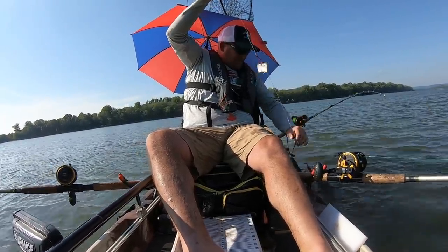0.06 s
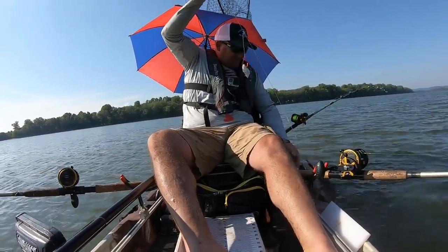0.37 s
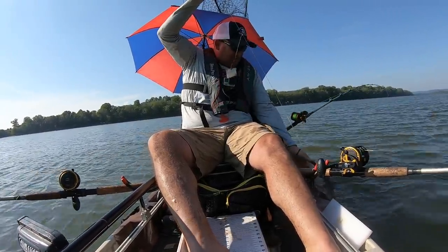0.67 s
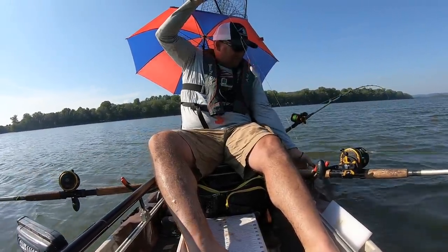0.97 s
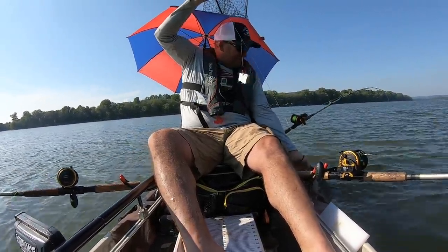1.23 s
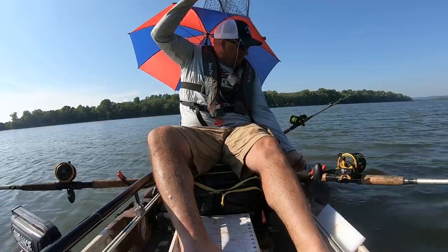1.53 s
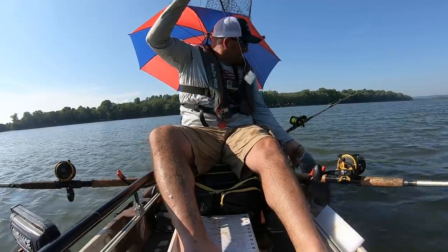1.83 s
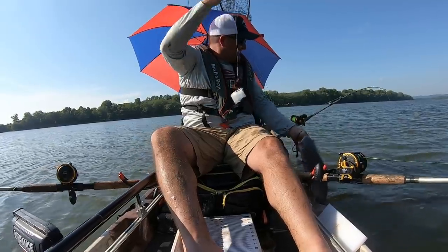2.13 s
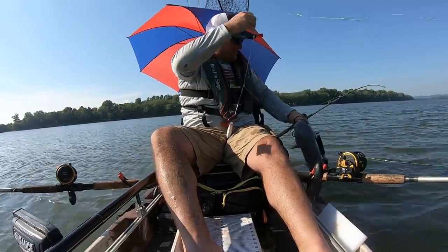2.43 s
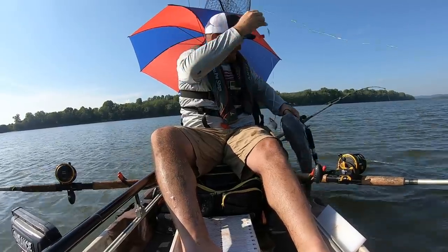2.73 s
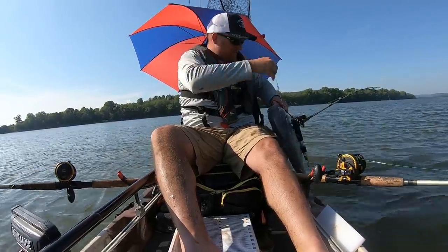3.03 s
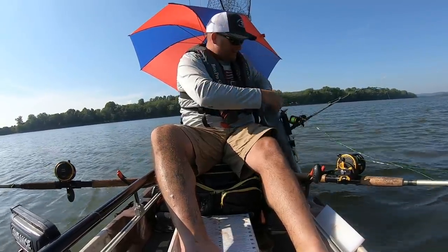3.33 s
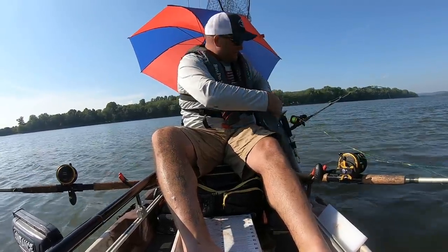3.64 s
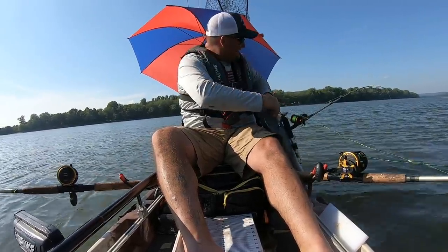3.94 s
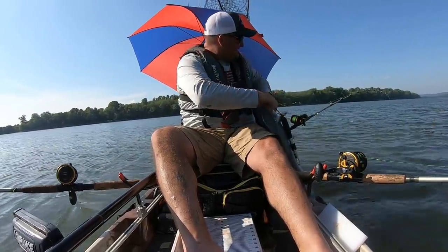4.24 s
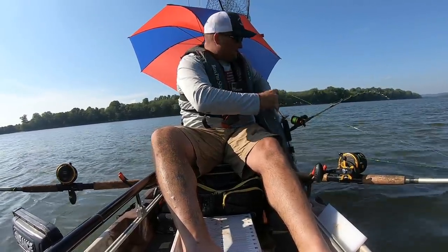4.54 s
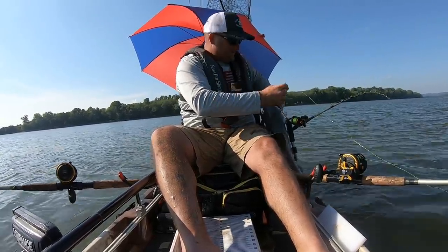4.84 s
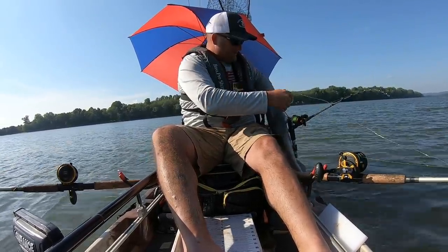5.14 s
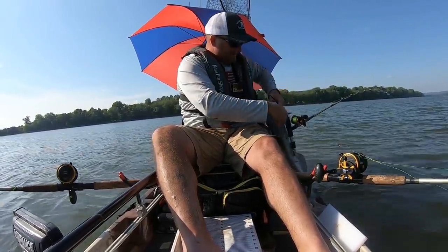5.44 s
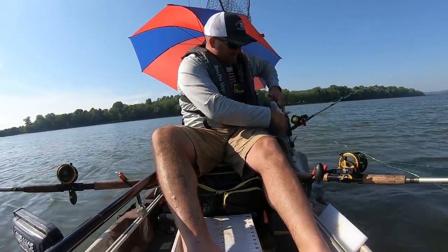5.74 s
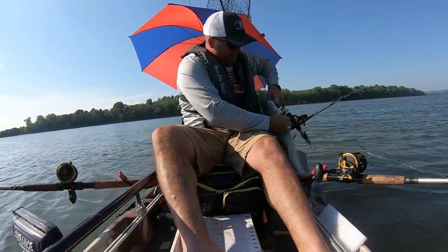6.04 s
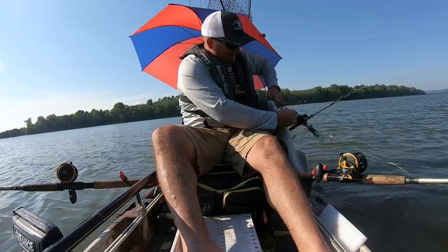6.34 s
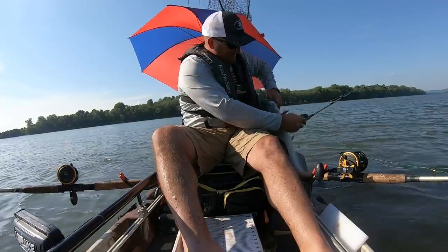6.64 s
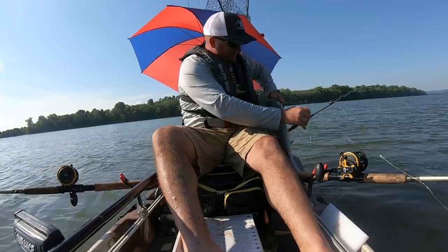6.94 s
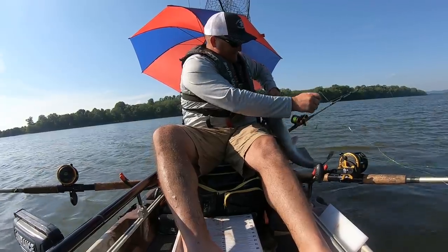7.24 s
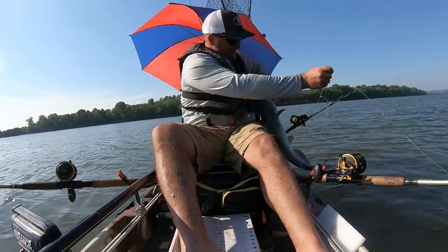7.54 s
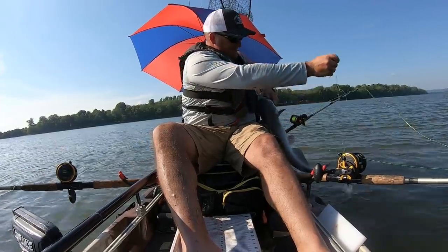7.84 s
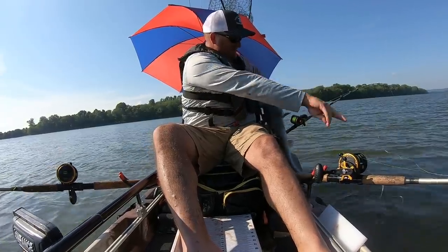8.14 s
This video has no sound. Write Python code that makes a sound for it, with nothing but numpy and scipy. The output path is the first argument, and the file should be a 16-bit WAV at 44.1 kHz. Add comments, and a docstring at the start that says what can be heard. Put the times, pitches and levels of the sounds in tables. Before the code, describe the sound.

A large fish and gear knock against a hollow plastic kayak, making the whole boat boom. Small waves then slap and lap at the side while fishing tackle clicks and a sleeve swishes softly. A cluster of heavy knocks follows, then a short scrape and another burst of knocks. Wind rumbles on the close microphone throughout, out on open water.

```python
"""A large fish is hauled up the side of a plastic kayak on open water.
First the fish and gear knock on the hollow hull, and the whole boat booms.
Then small waves slap the side while fishing tackle clicks and a wet sleeve swishes.
Heavy knocks come at about 5 s; near 7 s a short scrape leads into another burst of them.
All along, wind and the rocking boat rumble under a thin hiss, with faint chirps in the first half."""
import sys
import numpy as np
from scipy import signal
from scipy.fft import rfft, irfft, next_fast_len
from scipy.io import wavfile
from scipy.ndimage import uniform_filter1d

SR = 44100
rng = np.random.default_rng(int(sys.argv[2]) if len(sys.argv) > 2 else 0)


def dump(signal):
    """Clip the signal to [-1, 1] and save it as 16-bit WAV at the path in sys.argv[1]."""
    limited = np.clip(np.atleast_2d(signal).T, -1, 1)
    pcm = np.round(limited * 32767).astype(np.int16)
    wavfile.write(sys.argv[1], SR, pcm)


N = 361368
TIME = np.arange(N) / SR
RING = 16384  # samples given to one hit to ring out
RING_HZ, RING_S = np.fft.rfftfreq(RING, 1 / SR), np.arange(RING) / SR


def hull_hits(direct_db=-2, plate_db=0.5, cavity_db=-2, cavity_fade_s=.34, lag_s=.0014,
              note_db=2, note_sharpness=4, return_db=-4, return_s=0.023, return_hz=380):
    """Each hit sends bending waves through the plastic shell, which echo round it and stir the air inside."""
    # the fish and gear knock; harder contact has a higher corner, the pitch above which the treble falls:
    # (time [s], strength [dB], corner [Hz], fall [dB per octave], bass [dB], note of the spot [Hz])
    knocks = [(0.1172, 22, 880, 9.5, 8, 2290), (0.1796, 6.5, 1960, 13.5, -5, 590),
              (0.1864, 28, 286, 10, -7, 2280), (0.3952, -1, 460, 8, 7, 616),
              (0.4614, 11.5, 306, 10.5, -11, 657), (1.1567, 8, 355, 10.4, -2, 517),
              (1.253, -9, 1780, 13, 4, 525), (2.7526, -14.5, 1140, 12, 5, 294),
              (2.982, -13, 3140, 27, 15, 1194), (3.2637, 22, 630, 18, -9.5, 282),
              (4.2413, 2.5, 492, 7.3, -16.5, 326), (4.854, 9.5, 450, 9, -4, 684),
              (4.91, 11.5, 366, 9, -8, 1680), (5.0369, 30, 844, 11, -4, 313),
              (5.2543, 36.5, 597, 14, -9.5, 1660), (5.291, 23.5, 386, 12.5, -13, 900),
              (5.3425, 37.5, 584, 16.5, -14.5, 1100), (5.398, 14.5, 2170, 19.5, 7, 780),
              (6.0536, 12, 1230, 17, -10.5, 1220), (6.558, -10.5, 1220, 15.5, 8, 1195),
              (7.0413, 21, 967, 16.5, -9, 870), (7.1533, 28.5, 332, 17.5, -23, 854),
              (7.168, 6.5, 1340, 20, 8, 295), (7.1979, 10.5, 1330, 18.5, 0, 2320),
              (7.2073, 6.5, 1660, 28, 4, 375), (7.2341, 24.5, 1120, 16, -8.5, 350),
              (7.4328, -16, 2490, 14, -2, 1490), (7.7568, -13, 600, 16, 8.5, 286)]
    # the notes the hull rings with: (pitch [Hz], width [Hz], level [dB])
    hull_notes = [(174.5, 20, -4.5), (220.3, 6.5, -0.5), (325.8, 20, -1), (352, 34, -6.5), (455, 14, -6.5),
                  (531, 65, -10), (638, 30, -9), (742, 35, -5.5), (948, 12, -6.5), (1170, 40, -8.5),
                  (1620, 15, 3), (1945, 32, -2), (2193, 81, 0.5), (2600, 50, -2), (2965, 50, -6.5),
                  (3380, 90, -6), (5105, 206, 11.5), (5776, 180, -1)]
    # how long waves last in the shell: (frequency [Hz], time to fade by 60 dB [s])
    plate_fades = [(110, 0.43), (220, 0.21), (440, 0.13), (880, 0.086), (1760, 0.03), (3500, 0.05),
                   (7000, 0.031), (14000, 0.029)]
    # the air inside the hull rings on softly: (frequency [Hz], level [dB])
    cavity_colour = [(110, -20.5), (220, -16.5), (440, -28.5), (880, -8), (1760, -13), (3500, -15),
                     (7000, -37), (14000, -45.5)]
    # the tone of the hull as a whole: (frequency [Hz], level [dB])
    hull_colour = [(40, -18.5), (100, -7.5), (170, -1.5), (280, -3), (400, -5.5), (560, -3), (900, -5),
                   (1150, -2), (1450, -6), (2100, -4.5), (2550, -3.5), (2830, -6), (3450, -4.5),
                   (4200, -10), (8500, -4.5), (15000, -6)]
    out = np.zeros(N)
    centres, fades_s = np.transpose(plate_fades)
    bands = octave_bands(centres)
    cavity = hit_spectrum(cavity_db + colour_at(cavity_colour, RING_HZ))
    colour_db = colour_at(hull_colour, RING_HZ)
    for s, db, corner_hz, fall_db, bass_db, note_hz in knocks + wave_slaps() + scrape():
        # a soft contact lasts longer and cannot stir up the treble
        treble_loss_db = fall_db / 4 * np.log2(1 + (RING_HZ / corner_hz) ** 4)
        contact_db = bass_db / (1 + (RING_HZ / 300) ** 4) - treble_loss_db
        # the struck panel, or the air trapped against it, gives each hit its own hollow note
        detune = (RING_HZ + 1) / note_hz
        note = 1 + amp(note_db) / (1 + 1j * note_sharpness * (detune - 1 / detune))
        shell = note * (amp(direct_db) + amp(plate_db) * echoes(bands, fades_s, rise_s=0.0007))
        # only the low waves return from the far end of the boat, as a sinking plop
        low_waves = amp(return_db) / (1 + (RING_HZ / return_hz) ** 4)
        far_end = low_waves * bending(return_s * rng.uniform(.8, 1.2))
        inside = cavity * echoes(bands, cavity_fade_s, rise_s=0.01)
        push = hit_spectrum(contact_db + colour_db) * bending(lag_s)
        hit = push * (shell + far_end + inside) * ringing(hull_notes, spread_db=2.0)
        add(out, s - lag_s / 2, amp(db) * irfft(hit))
    return out


def wave_slaps(fall_db=17.5, bass_db=-7, pocket_hz=477, spread=0.084):
    """Lists hits of water on the hull: each is soft and traps a pocket of air of about the same note."""
    # a flatter, sharper slap has a higher corner: (time [s], strength [dB], corner [Hz])
    slaps = [(0.3051, 7, 500), (0.732, 6, 700), (1.0388, 12, 296), (1.146, 2, 755), (1.4397, -4.5, 610),
             (1.7978, 18, 420), (1.916, 18, 436), (2.0279, 11, 380), (2.0985, 3.5, 400), (2.4844, 24, 472),
             (3.272, 12.5, 864), (3.3355, 13.5, 420), (3.3914, 9, 433), (3.602, 18, 497), (3.836, 1.5, 536),
             (3.8642, 6, 388), (3.9185, 4, 470), (3.9547, 12, 583), (4.0383, 15.5, 553), (4.3379, 5.5, 396),
             (4.6613, 0, 870), (4.6882, 6, 440), (4.7202, 12.5, 962), (4.7788, 15.5, 768),
             (4.811, 12.5, 458), (5.3131, 16.5, 836), (5.5053, 11.5, 350), (5.53, 1.5, 1050),
             (5.613, 29, 464), (5.631, 7, 495), (5.7422, 2, 750), (5.8363, 17.5, 382)]
    return [(s, db, corner_hz, fall_db, bass_db, pocket_hz * np.exp(spread * rng.standard_normal()))
            for s, db, corner_hz in slaps]


def scrape(start_s=6.951, gap_s=.0255, first_db=-15.5, growth_db=4.5, count=4):
    """Lists the hits of a short scrape on the hull: evenly spaced slips, each harder than the last."""
    # how one slip meets the hull: (corner [Hz], fall [dB per octave], bass [dB], note [Hz])
    contact = (1890, 28, -23, 1284)
    return [(start_s + k * gap_s, first_db + k * growth_db, *contact) for k in range(count)]


def boat_booms():
    """The whole boat swings with a low note when weight shifts."""
    # the booms: (time [s], pitch [Hz], level [dB], time to fade by 60 dB [s])
    booms = [(0.127, 169, -17, 0.21), (0.166, 67.6, -11.5, 0.23), (0.199, 139.4, -15, 0.163),
             (0.385, 142.4, -29.5, 0.36), (0.469, 77.7, -26, 0.39), (3.016, 138, -25, 0.23),
             (5.062, 214.3, -14, 0.17), (5.39, 64, -25, 0.21)]
    out = np.zeros(N)
    for s, hz, db, fade_s in booms:
        add(out, s, fading_note(hz, db, fade_s, rise_s=0.0087))
    return out


def tackle_clicks(click_db=-1, rattle_db=-1, rattle_fade_s=.032, pivot_hz=4500, top_hz=11500, low_hz=1300):
    """Small hard parts, each of a slightly different size, snap together and rattle for a moment."""
    # the clicks: (time [s], strength [dB], relative brightness [dB per octave])
    clicks = [(0.1152, -10, 5), (0.18, -18, -2), (0.186, -19.5, 8.5), (0.46, -23, -2.5), (0.979, -29, 0),
              (1.04, -32.5, -2), (1.833, -25, -7), (3.0187, -30, 5), (3.477, -27, -5),
              (3.5565, -18.5, -2.5), (3.6253, -13.5, -0.5), (3.8237, -32, -4), (4.2389, -20.5, 1),
              (4.3007, -32.5, -3), (4.464, -17, 2), (4.906, -15.5, 3), (6.214, -28.5, 1.5),
              (6.383, -21.5, -3.5), (6.602, -15.5, -1), (7.0227, -33, -1), (7.0859, -32, -10),
              (7.8586, -35, -2)]
    # the notes the tackle rings with: (pitch [Hz], width [Hz], level [dB])
    tackle_notes = [(2250, 250, -1.5), (3180, 260, 5), (5130, 240, 4.5), (6880, 194, -11.5),
                    (8850, 470, 5.5)]
    out, bands = np.zeros(N), octave_bands([1000, 4000, 12000])
    body_db = -10 * np.log10((1 + (RING_HZ / top_hz) ** 6) * (1 + (low_hz / (RING_HZ + 1)) ** 2))
    for s, db, bright_db in clicks:
        tilt_db = (bright_db - 4.0) * np.log2(np.maximum(RING_HZ, 2500) / pivot_hz)
        snap = 0.13 + amp(rattle_db) * echoes(bands, rattle_fade_s, rise_s=0.00028)
        part_notes = np.array(tackle_notes) * [rng.uniform(.93, 1.07), 1, 1]
        click = hit_spectrum(tilt_db + body_db) * snap * ringing(part_notes, spread_db=0)
        add(out, s, amp(db + click_db) * irfft(click))
    return out


def drip_plinks():
    """Drips and small bits of gear ring with a note that dies almost at once."""
    # the plinks: (time [s], pitch [Hz], level [dB])
    plinks = [(.1172, 2210, -12), (0.1192, 1100, -17), (0.1187, 3630, -29), (1.069, 1090, -48),
              (2.224, 1640, -48.5), (2.605, 1500, -47), (2.981, 3220, -46), (2.986, 1240, -42.5),
              (6.055, 1290, -22), (6.558, 1284, -45), (6.603, 3220, -47), (6.601, 4940, -41),
              (7.13, 1220, -34)]
    out = np.zeros(N)
    for s, hz, db in plinks:
        add(out, s, fading_note(hz, db, fade_s=.032, rise_s=.0005))
    return out


def lapping(lap_db=-2, pops_per_s=520, size_db=2.5, wash=0.7, calm_db=-68, pitches=24):
    """Small pockets of air pop dully along the waterline, over a soft wash; both swell with each slosh."""
    # water sloshes along the side: (peak time [s], length [s], level [dB])
    sloshes = [(0.0, 0.19, -51), (0.39, 0.39, -48.5), (1.03, 0.29, -51), (1.75, 0.44, -47.5),
               (3.31, 0.37, -50), (3.65, 0.29, -50.5), (4.33, 0.61, -49), (4.86, .3, -50),
               (5.56, 0.33, -51.5), (7.0, 0.23, -55.5)]
    # the dull tone of the water: (frequency [Hz], level [dB])
    water_colour = [(100, -10), (250, 1), (480, -2), (800, -5.5), (1300, -12.5), (2500, -14.5), (5000, -24),
                    (12000, -48)]
    pops, t = np.zeros(N), RING_S[:4096]
    for hz in np.geomspace(240, 1800, pitches):
        age = t * hz / 2.5  # higher bubbles die sooner
        bubble = np.exp(-age) * (1 - np.exp(-6 * age)) * np.sin(2 * np.pi * hz * t)
        sizes = amp(size_db * np.minimum(rng.exponential(1, N), 4))
        starts = rng.random(N) < pops_per_s / pitches / SR
        pops += signal.oaconvolve(sizes * starts, evened(bubble))[:N]
    stir = np.hypot(amp(calm_db), swells(sloshes, rise=.35, shape=2.0))
    water = evened(pops) + wash * rng.standard_normal(N)
    return amp(lap_db) * stir * coloured(water, water_colour)


def sleeve_swishes(rub_db=-1, grain_db=1.5, rest_db=-81, fizz_db=-3, fizz_growth=.6):
    """Cloth slides over the life vest in small uneven slips; a faster stroke is brighter."""
    # strokes of the sleeve: (peak time [s], length [s], level [dB])
    strokes = [(1.25, .5, -69), (1.73, .55, -64.5), (2.36, 0.4, -56.5), (3.83, 0.28, -59),
               (4.68, 0.15, -58.5), (6.2, 0.82, -69.5), (7.57, 1.18, -63), (8.1, .5, -67)]
    # the tone of rubbing cloth: (frequency [Hz], level [dB])
    rub_colour = [(300, -6), (1150, 13), (1600, 6), (3200, 1), (5500, -0.5), (8000, -1.5), (11000, -4.5),
                  (14000, -5.5), (16000, -10.5)]
    # the extra treble of a fast stroke: (frequency [Hz], level [dB])
    fizz_colour = [(3000, -22), (7000, -6), (11000, -1.5), (14000, -5), (16000, -13)]
    slips = evened(uniform_filter1d(rng.standard_normal(N), 200))
    speed = np.hypot(amp(rest_db), swells(strokes, rise=0.5, shape=1.13))
    rub = amp(rub_db) * noise(rub_colour)
    fizz = amp(fizz_db) * (speed / speed.max()) ** fizz_growth * noise(fizz_colour)
    return speed * (rub + fizz) * evened(amp(grain_db * slips))


def rumble(wind_db=3, rock_db=-1.0):
    """Wind buffets the microphone, and the hull rocks under it, harder at each lurch."""
    # the slow rise and fall of the rumble: (time [s], wind level [dB], rocking level [dB])
    drift = [(0, -28, -45.5), (.45, -26, -44), (.85, -32, -49.5), (1.2, -40, -40.5), (1.52, -24, -55),
             (1.8, -39.5, -45), (2.1, -30, -46.5), (3.25, -25, -42.5), (3.7, -23.5, -36.5),
             (4.25, -29, -46.5), (4.7, -29, -41), (5.15, -24, -39.5), (6.1, -35.5, -53), (6.8, -31, -48.5),
             (7.55, -27.5, -51.5), (8.19, -31, -49)]
    # the boat lurches: (peak time [s], length [s], level [dB])
    lurches = [(0.15, 0.27, -23.5), (0.53, 0.39, -37.5), (2.53, 0.15, -33.5), (4.08, 0.089, -38),
               (5.07, 0.21, -27.5)]
    # the very deep tone of the wind: (frequency [Hz], level [dB])
    wind_colour = [(4, -1.5), (10, 5.5), (16, 6.5), (25, 6), (40, -10.5), (60, -16.5), (100, -31.5),
                   (200, -76)]
    # the low tone of the rocking hull: (frequency [Hz], level [dB])
    rock_colour = [(30, -26.5), (55, -4.5), (72, 0), (100, -6.5), (150, -16.5), (250, -20.5), (500, -42),
                   (1000, -69)]
    times, gusts_db, sway_db = np.transpose(drift)
    gusts = amp(np.interp(TIME, times, gusts_db))
    sway = amp(np.interp(TIME, times, sway_db))
    rocking = np.hypot(sway, swells(lurches, rise=0.23, shape=1.3))
    return amp(wind_db) * gusts * noise(wind_colour) + amp(rock_db) * rocking * noise(rock_colour)


def faint_chirps():
    """Thin, slightly raspy whistles rise and fall in pitch."""
    # the chirps: (middle time [s], length [s], top pitch [Hz], level [dB])
    chirps = [(0.973, 0.092, 3020, -62), (1.647, 0.024, 3180, -60), (2.082, 0.0094, 2560, -48),
              (2.461, 0.025, 2340, -55.5), (2.949, 0.033, 2400, -57.5), (3.113, 0.015, 2850, -59.5)]
    out = np.zeros(N)
    for s, length, hz, db in chirps:
        position = np.linspace(-1, 1, round(length * SR))
        rasp = .04 * evened(uniform_filter1d(rng.standard_normal(RING), 50))[:len(position)]
        cycles = np.cumsum(hz * (1 - 0.095 * position ** 2 + rasp)) / SR
        add(out, s - length / 2, amp(db) * np.cos(np.pi * position / 2) * np.sin(2 * np.pi * cycles))
    return out


def air_hiss(level_db=-60.5):
    """Quiet, steady air with a thin hiss near 8 kHz."""
    # the tone of the air: (frequency [Hz], relative level [dB])
    air_colour = [(100, 14), (300, 4), (800, 3.5), (1500, -5), (2400, -8), (3100, -6), (4000, -12.5),
                  (5100, -10), (6600, -16), (7900, -1), (9200, -16), (12000, -17), (16000, -24)]
    return amp(level_db) * noise(air_colour)


def amp(db):
    """Turns decibels into a number to multiply a sound by."""
    return 10 ** (np.asarray(db) / 20)


def evened(x):
    """Scales a sound to an average power of 1."""
    return x / np.sqrt(np.mean(x ** 2) + 1e-20)


def add(mix, s, sound):
    """Mixes a sound in at s seconds."""
    part = mix[max(round(s * SR), 0):][:len(sound)]
    part += sound[:len(part)]


def colour_at(colour, hz):
    """Looks up levels in a colour: a table of how strong each frequency is."""
    frequencies, db = np.transpose(colour)
    return np.interp(np.log(hz + 1), np.log(frequencies + 1), db)


def coloured(x, colour):
    """Filters a long sound by a colour and scales it to a power of 1."""
    size = next_fast_len(N)
    gains = amp(colour_at(colour, np.fft.rfftfreq(size, 1 / SR)))
    return evened(irfft(rfft(x, size) * gains, size)[:N])


def noise(colour):
    """Steady noise of a given colour."""
    return coloured(rng.standard_normal(N), colour)


def hit_spectrum(db):
    """A spectrum with these levels, timed so that nothing sounds before the hit (minimum phase)."""
    cepstrum = irfft(np.log(amp(np.maximum(db, db.max() - 100))))
    cepstrum[1:RING // 2] *= 2
    cepstrum[RING // 2 + 1:] = 0
    return np.exp(rfft(cepstrum))


def ringing(notes, spread_db):
    """Spectrum of an object's own notes; each struck spot favours different ones, by spread_db."""
    weights = amp(spread_db * rng.standard_normal(len(notes)))
    return 1 + sum(weight * amp(db) / (1 + 2j * (RING_HZ - hz) / width)
                   for weight, (hz, width, db) in zip(weights, notes))


def octave_bands(centres):
    """Overlapping frequency bands whose powers add up to 1."""
    return np.sqrt([np.interp(np.log(RING_HZ + 1), np.log(centres), row) for row in np.eye(len(centres))])


def echoes(bands, fades_s, rise_s):
    """Spectrum of a dense crowd of echoes; each band dies by 60 dB in its fade time."""
    waves = irfft(rfft(rng.standard_normal((len(bands), RING))) * bands)
    waves *= np.exp(-np.log(1000) * RING_S / np.reshape(fades_s, (-1, 1))) * (1 - np.exp(-RING_S / rise_s))
    waves *= np.sqrt(np.mean(bands ** 2, axis=1) / np.sum(waves ** 2, axis=1))[:, None]
    return rfft(waves.sum(axis=0))


def bending(lag_s):
    """High bending waves travel faster: treble arrives first, 500 Hz after about lag_s, the bass later."""
    return np.exp(-4j * np.pi * lag_s * np.sqrt(500) * (np.sqrt(RING_HZ + 50) - np.sqrt(50)))


def fading_note(hz, db, fade_s, rise_s):
    """One pure note that dies by 60 dB in fade_s."""
    envelope = np.exp(-np.log(1000) * RING_S / fade_s) * (1 - np.exp(-RING_S / rise_s))
    return amp(db) * envelope * np.sin(2 * np.pi * hz * RING_S)


def swells(rows, rise, shape):
    """Loudness of swells that rise for a share of their length, then fall; 20 dB down at both ends."""
    power = np.zeros(N)
    for s, length, db in rows:
        away = np.maximum((s - TIME) / rise, (TIME - s) / (1 - rise)) / length
        near = away < 2
        power[near] += amp(db - 20 * away[near] ** shape) ** 2
    return np.sqrt(power)


def scene():
    """Everything on and around the boat, in one channel."""
    boat = hull_hits() + tackle_clicks() + boat_booms() + drip_plinks() + sleeve_swishes()
    return (boat + lapping() + rumble() + faint_chirps() + air_hiss())[None]


def record(dry):
    """Rounds off the highest peaks, then cuts the treble above 16 kHz."""
    clean = np.clip(dry, -.65, .65)
    rounded = clean + .3 * np.tanh((dry - clean) / .3)
    treble_cut = signal.firwin(511, 16000, window=("kaiser", 9), fs=SR)
    return signal.oaconvolve(rounded, treble_cut[None], "same")


dry = scene()
out = record(dry)
dump(out)
```